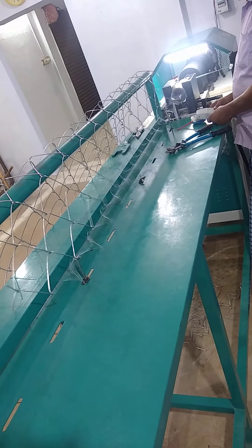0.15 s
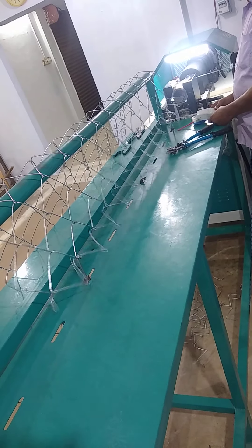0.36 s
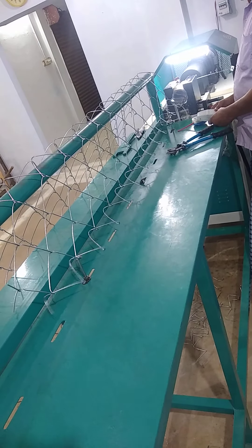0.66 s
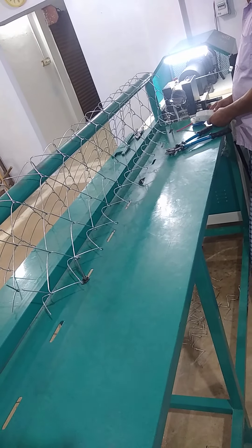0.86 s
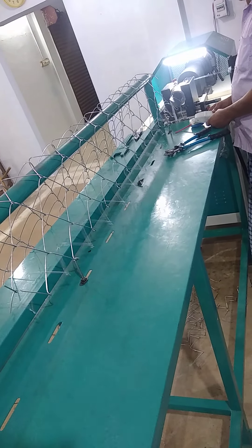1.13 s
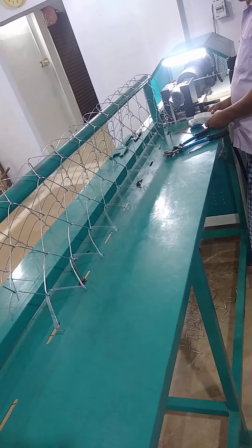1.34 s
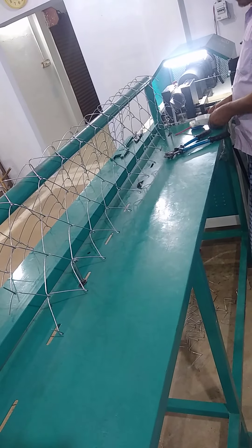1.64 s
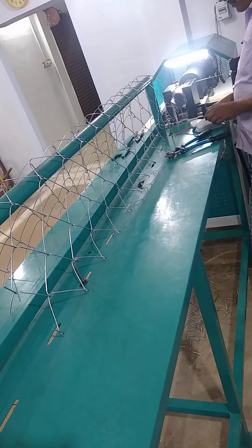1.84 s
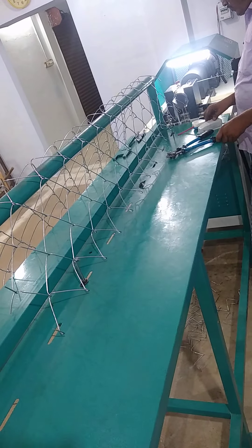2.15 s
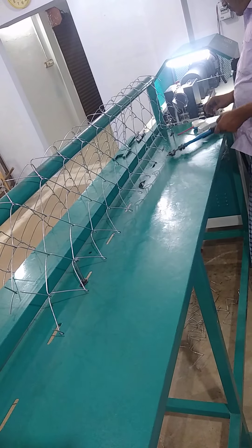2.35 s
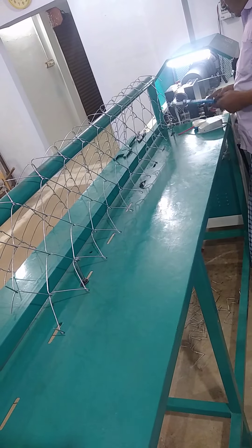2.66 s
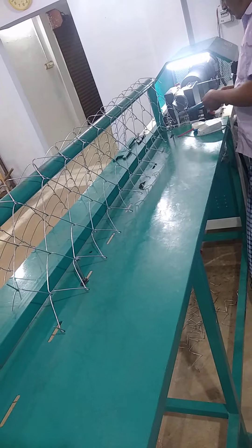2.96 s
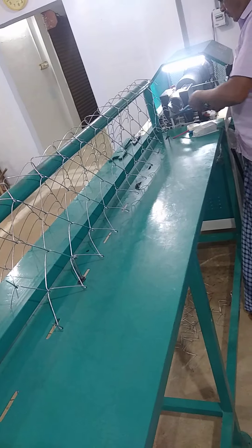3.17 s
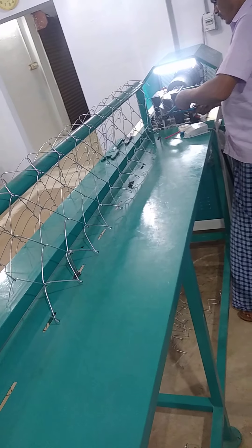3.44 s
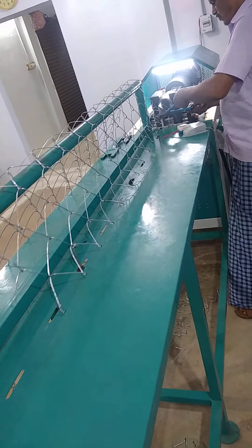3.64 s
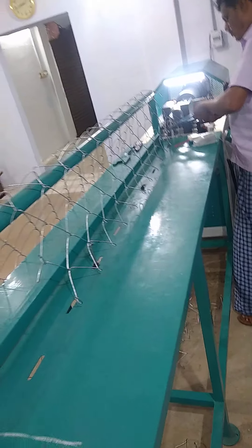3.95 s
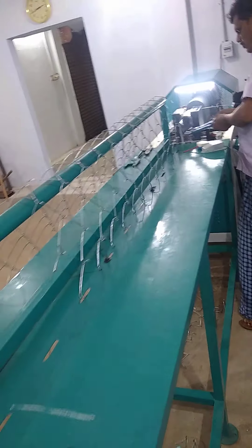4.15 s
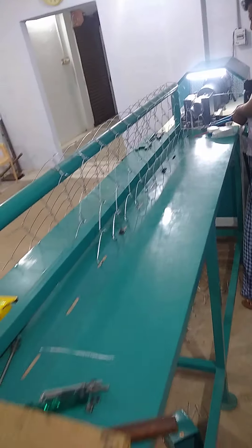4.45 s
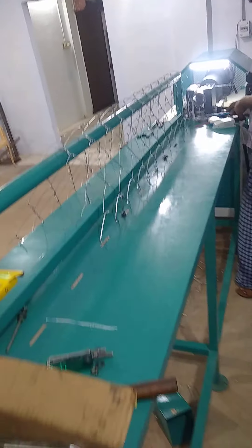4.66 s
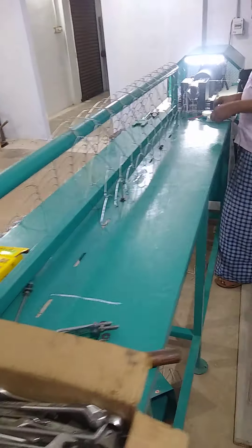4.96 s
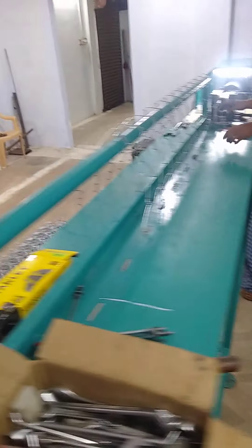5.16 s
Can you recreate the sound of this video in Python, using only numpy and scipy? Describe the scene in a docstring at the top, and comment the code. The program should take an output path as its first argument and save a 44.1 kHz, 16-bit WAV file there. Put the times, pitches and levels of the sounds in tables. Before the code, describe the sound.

A phone at the end of a long steel bench picks up a wire-mesh machine: rough grinding and clattering at once, a run-down, a second very short burst, another coast. Steel knocks ring with diffuse room echoes. Between them the motor idles with airy hum and a steady piercing buzz near four kilohertz. Late on, loose links jangle and parts thump on the bench.

```python
"""Chain-link fence machine in an echoing workshop

The drive feeds a wire spiral in two short runs of grinding and chatter, coasting down after each.
Fan air, a steady hum, a high buzz and a whine sound throughout; the wire squeals near the start.
Struck steel knocks and clanks and loose mesh jangles: bursts of shaped noise that die away, with frame modes.
Noise tails add echoes; a phone with two ports and a stereo widener listens from the far end of the bench.
"""
import sys
import numpy as np
from scipy import signal
from scipy.fft import rfft, irfft, next_fast_len
from scipy.io import wavfile

SR = 44100
rng = np.random.default_rng(int(sys.argv[2]) if len(sys.argv) > 2 else 0)


def int16_out(signal):
    """Quantize to a 16-bit WAV file."""
    q = np.round(np.clip(np.atleast_2d(signal).T, -1, 1) * 32767)
    wavfile.write(sys.argv[1], SR, q.astype(np.int16))


N = 233857
TIME = np.arange(N) / SR
ROTOR_HZ = 55.17   # turns of the idling rotor per second
WHINE_ORDER = 73   # the whine's pitch, in multiples of the rotor speed
CUTOFF_HZ = 15500   # the phone passes nothing much above this

# tone of wire struck on wire: (frequency [Hz], relative level per Hz [dB])
WIRE_COLOUR = [(60, -24), (200, 0.5), (700, 9), (2300, 8.5), (4300, 10), (5500, 7), (7800, -4.5), (9900, 3),
               (11000, 3.5), (15000, -3.5)]
# the workshop's echoes:
# (frequency [Hz], time to fall 60 dB [s], echo level against direct sound [dB], likeness at the ports [-1 to 1])
ROOM = [(103, 0.5, -0.5, 0.93), (300, 1.22, 6.5, 0.46), (683, 0.77, 3.5, 0.61), (1280, 0.71, 1, 0),
        (4300, 0.52, -0.5, 0), (8420, 0.45, -3, 0), (15000, 0.22, -6.5, 0.016)]


def from_db(db):
    """Turn decibels into a gain."""
    return 10 ** (np.asarray(db) / 20)


def rms_one(x):
    """Scale to an rms (average strength) of one."""
    return x / np.sqrt(np.mean(x ** 2) + 1e-20)


def per_bin(points, size):
    """Read a (Hz, value) table at every frequency of a transform, on a logarithmic pitch scale."""
    hz, value = np.transpose(points)
    bin_hz = np.fft.rfftfreq(size, 1 / SR)
    return np.interp(np.log(bin_hz + 1), np.log(hz), value)


def colour(x, spectrum, extra_db=0):
    """Shape white noise to a spectrum of unit power, then add an emphasis."""
    size = x.shape[-1]
    gain = rms_one(from_db(per_bin(spectrum, size)))
    return irfft(rfft(x) * gain * from_db(extra_db), size)


def drift(rate):
    """Wander at random around zero, joining `rate` chance values per second by straight lines."""
    knots = rng.standard_normal(int(N / SR * rate) + 2)
    return np.interp(TIME * rate, np.arange(len(knots)), knots)


def diffuse(size):
    """Make white noise arriving from all sides, as alike at the two ports as ROOM says."""
    alike = np.clip(per_bin([(row[0], row[3]) for row in ROOM], size), -1, 1)
    mid, side = rfft(rng.standard_normal((2, size)))
    shared = np.sqrt((1 + alike) / 2) * mid
    opposed = np.sqrt((1 - alike) / 2) * side * [[1], [-1]]
    return irfft(shared + opposed, size)


def add(track, s, sound):
    """Mix a sound into a track at time s, dropping what runs past the end."""
    start = round(s * SR)
    part = sound[..., :N - start]
    track[..., start:start + part.shape[-1]] += part


def hump(hz, width):
    """Give the spectrum of one crowded group of modes; `width` [Hz] is taken 6 dB below the peak."""
    ratio = np.geomspace(1 / 12, 12, 181)
    detune = (ratio - 1 / ratio) * hz / width
    return np.column_stack([hz * ratio, -20 * np.log10(1 + detune ** 2)])


def dense_ring(spectrum, extra_db, t60, rise_s, rattle_db):
    """Ring countless close modes of struck steel as fading noise; tiny rebounds make the decay uneven."""
    t = TIME[:SR // 2]
    rebounds = rms_one(from_db(rattle_db * drift(371)[:len(t)]))
    envelope = from_db(-60 * t / t60) * (1 - np.exp(-t / rise_s))
    return colour(diffuse(len(t)), spectrum, extra_db) * rebounds * envelope


def frame(clicks, spread_db=2):
    """Ring the steel frame: every contact excites each mode with a strength and sign of its own."""
    # (frequency [Hz], relative level [dB], time to fall 60 dB [s])
    modes = [(119.8, -9.5, 0.43), (239.5, -14.5, 0.25), (319.4, -9, 0.23), (541, 0.5, 0.084),
             (614, -4, 0.14), (674, -0.5, 0.088), (703, -4, 0.099), (831, -5, 0.13), (955, -6, 0.17),
             (1175, -17, 0.076), (1451, 1, 0.061), (1542, -2, 0.057), (3090, -5, 0.03), (3560, -5, 0.028),
             (5975, -0.5, 0.04)]
    out = np.zeros(N)
    at = np.flatnonzero(clicks)
    for hz, db, t60 in modes:
        sign, strength = rng.standard_normal((2, len(at)))
        push = np.full(N, 1e-18)   # a trace of input keeps the filter out of slow, tiny numbers
        push[at] += clicks[at] * np.sign(sign) * from_db(spread_db * strength)
        # a two-pole filter rings as a decaying cosine
        r = from_db(-60 / (t60 * SR))
        w = 2 * np.pi * hz / SR
        out += from_db(db) * signal.lfilter([1, -r * np.cos(w)], [1, -2 * r * np.cos(w), r * r], push)
    return out


def workshop(x, lead=0, first_echo_s=0.0011):
    """Add a diffuse tail off plaster walls, shorter in the treble; every call draws new echoes."""
    t = TIME[:SR]
    x = np.atleast_2d(x)
    noise = rfft(diffuse(SR))
    tail = 0
    for k, (hz, t60, db, alike) in enumerate(ROOM):
        band = per_bin([(row[0], j == k) for j, row in enumerate(ROOM)], SR)
        decay = from_db(-60 * t / t60) * (1 - np.exp(-t / first_echo_s))
        tail = tail + from_db(db) * irfft(noise * band, SR) * decay / np.linalg.norm(decay)
    # the last channel feeds the echoes; a mirrored lead-in of `lead` samples has the room already ringing
    running = np.pad(x[-1:], ((0, 0), (lead, 0)), "reflect")
    out = signal.fftconvolve(running, tail, axes=1)[:, lead:]
    out[:, :x.shape[1]] += x
    return out[:, :N]


def idle(fan_db=-38, hum_db=-42.5, hum_waver_db=1.1, mains_hz=50.1):
    """Sound the fan's air as shaped noise and the drive's magnetic hum at four times the mains."""
    # tone of the air: (frequency [Hz], relative level per Hz [dB])
    fan_colour = [(25, -9), (60, -14), (120, -2), (260, -0.5), (420, -3.5), (750, -4), (1400, -9),
                  (2600, -13.5), (4000, -8.5), (5500, -20), (7000, -33), (9000, -37.5), (11500, -39),
                  (15000, -45.5)]
    air = from_db(fan_db) * colour(diffuse(N), fan_colour)
    hum = np.sin(2 * np.pi * 4 * mains_hz * TIME)
    return air + hum * from_db(hum_db + hum_waver_db * drift(8.3))


def buzz_level(start_db=-40, fade_db_per_s=0.5):
    """Ease the level of the idle buzz and whine slowly down."""
    return from_db(start_db - fade_db_per_s * TIME)


def buzz(scatter_db=2, smear_turns=2.1, flutter_db=0.2, size=8192):
    """Repeat the idling rotor's rasp once a turn, which makes a comb of fine lines."""
    # strength of the lines: (frequency [Hz], relative level [dB])
    buzz_colour = [(200, -26.5), (2800, -39), (3350, -4), (3700, 9.5), (3960, 15.5), (4100, 14),
                   (4600, 2.5), (5100, 2), (6700, -24.5), (7900, -9), (9200, -66), (10800, -21),
                   (11900, -14.5), (13200, -48)]
    turn = np.arange(size) / size
    orders = np.arange(size // 2 + 1)
    hz, db = np.transpose(buzz_colour)
    line_db = np.interp(orders * ROTOR_HZ, hz, db) + scatter_db * rng.standard_normal((2, len(orders)))
    line_db[:, WHINE_ORDER] = -60   # this order sounds as the whine instead
    # echoes smear the rasp differently at each port: only the phases of this noise are used
    rasp = rfft(rng.standard_normal((2, size)) * np.exp(-turn / smear_turns))
    phases = rasp / abs(rasp)
    audible = orders * ROTOR_HZ < CUTOFF_HZ
    one_turn = irfft(phases * from_db(line_db) * audible, size)
    running = np.array([np.interp(ROTOR_HZ * TIME, turn, port, period=1) for port in one_turn])
    return buzz_level() * rms_one(running) * from_db(flutter_db * drift(12))


def whine(flutter_db=0.7, whine_db=-1.1):
    """Let one order of the rotor sing out as a sine near 4 kHz, fluttering slightly in level."""
    tone = from_db(whine_db) * np.sin(2 * np.pi * WHINE_ORDER * ROTOR_HZ * TIME)
    return tone * buzz_level() * from_db(flutter_db * drift(8.9))


def drive_level():
    """Under power the load surges evenly; once cut off, the drive coasts and its noise follows its speed."""
    # (start [s], cut-off [s], level [dB], time between surges [s])
    runs = [(0, 0.43, -25, 0.127), (1.125, 1.253, -27.5, 0.078)]
    spin_up_s, unload_s = 0.004, 0.0066   # taking up the load, and letting it go
    surge_db, last_surge_s = 4, 0.0071   # swing either way; the last peak comes this long before cut-off
    coast_db, coast_s = -32.5, 0.72   # freewheeling: level at full speed, time to standstill
    out = np.zeros(N)
    for start, stop, db, surge_s in runs:
        since_stop = np.maximum(TIME - stop, 0)
        engaged = np.clip((TIME - start) / spin_up_s, 0, 1)
        surge = np.cos(2 * np.pi * (TIME - stop + last_surge_s) / surge_s)
        load = from_db(db + surge_db * surge) * np.exp(-since_stop / unload_s)
        speed = np.maximum(1 - since_stop / coast_s, 0)
        out += engaged * np.hypot(load, from_db(coast_db) * speed)
    return out


def feed(contacts_per_s=170, rough_db=3.0, ring_db=-8):
    """Grind wire through the former (rough noise) while the spiral chatters (chance taps on the frame)."""
    # tone of the grinding: (frequency [Hz], relative level per Hz [dB])
    feed_colour = [(40, -43), (70, -28), (115, 3.5), (250, -2), (420, -7.5), (720, -2), (1400, -9.5),
                   (2300, -5.5), (4200, -9.5), (5500, -14), (7500, -28.5), (10000, -25), (14500, -26)]
    grind = colour(diffuse(N), feed_colour) * rms_one(from_db(rough_db * drift(110)))
    contacts = 1. * (rng.random(N) < contacts_per_s / SR)
    chatter = rms_one(frame(contacts))
    return drive_level() * (grind + from_db(ring_db) * chatter)


def thud(hz=387, level_db=-9.5, t60=0.025):
    """Swing the bench top once, low and solid, as it gives under a blow: a fading sine."""
    t = TIME[:SR // 2]
    return from_db(level_db - 60 * t / t60) * np.sin(2 * np.pi * hz * t)


def knocks(ring_db=-21, rattle_db=3.0):
    """Spiral, cutter and steel parts hit the bench: a crack, a dense clatter, a thud and frame modes."""
    # (time [s], level [dB], thump [dB], hardness [dB per octave of treble], time to fall 60 dB [s])
    blows = [(.003, -20.5, 0, 2, 0.13), (.062, -17.5, -6, -7, 0.17), (.134, -19, -9, -7, 0.12),
             (.192, -17, -5, 1, .11), (.312, -16.5, -6, -4.5, 0.22), (.394, -11, -18, -1, 0.14),
             (.432, -27, -4, 2.5, .08), (1.11, -18.5, -9, -3, 0.3), (1.161, -20, -8, 1, .1),
             (1.247, -19, -10, 1.1, 0.15), (1.833, -24.5, -14, -0.5, 0.095), (2.132, -9, -8, -0.5, 0.086),
             (2.143, -11, -9.5, -1.5, 0.064), (4.474, -12, 0.5, 0.55, 0.14), (4.689, -14, 2.5, 0.06, 0.19),
             (4.735, -17.5, -3.5, -0.46, 0.25), (4.899, -15, -24.5, -1.5, .1),
             (4.908, -13.5, -5.5, -1, 0.11)]
    # tone of the clatter: (frequency [Hz], relative level per Hz [dB])
    knock_colour = [(50, -45), (110, -21), (220, -12), (350, -6.5), (650, -3.5), (1000, -5.5), (1500, -5.5),
                    (2300, -8), (3400, -9), (4400, -9.5), (5500, -18), (7600, -31.5), (10000, -25),
                    (14500, -40)]
    thump_hz, treble_hz = 337, 790   # thump acts fully below the first, hardness above the second
    crack_db, crack_t60 = -15, 0.033   # the first hard touch, against the level of the blow
    crack_rise_s, clatter_rise_s = 0.00079, 0.0013
    out, clicks = np.zeros((2, N)), np.zeros(N)
    bass = per_bin([(thump_hz, 1), (treble_hz, 0)], SR // 2)
    bin_hz = np.fft.rfftfreq(SR // 2, 1 / SR)
    treble_octaves = np.log2(np.maximum(bin_hz / treble_hz, 1))
    for s, db, thump_db, hardness, t60 in blows:
        treble_db = hardness * treble_octaves
        crack = dense_ring(WIRE_COLOUR, treble_db, crack_t60, crack_rise_s, rattle_db)
        clatter_db = thump_db * bass + treble_db
        clatter = dense_ring(knock_colour, clatter_db, t60, clatter_rise_s, rattle_db)
        blow = from_db(crack_db) * crack + clatter + from_db(thump_db) * thud()
        add(out, s, from_db(db) * workshop(blow))   # each blow lands at another spot
        add(clicks, s, from_db([db]) * np.sqrt(t60 / 0.1))   # a brief touch hands the frame less energy
    add(out, 0, workshop(from_db(ring_db) * frame(clicks)))
    return out


def clanks(rise_s=0.0027, rattle_db=2):
    """Ring narrow bands of struck steel: clanks, a low thud, the body of heavy blows, a bright snip."""
    # (time [s], frequency [Hz], width [Hz], level [dB], time to fall 60 dB [s])
    bands = [(.031, 3200, 1100, -23.5, .16), (.17, 3300, 1300, -19, 0.065), (.293, 3430, 1200, -16, 0.055),
             (.399, 3070, 1200, -19.5, 0.1), (1.109, 1010, 550, -17.5, 0.27), (1.163, 174, 111, -20, 0.16),
             (1.179, 1590, 450, -13, 0.061), (1.231, 770, 520, -12.5, 0.086), (1.833, 945, 480, -20, 0.053),
             (1.835, 2600, 700, -24.5, 0.094), (3.936, 304, 180, -27, 0.059),
             (4.127, 9700, 1100, -21.5, .05), (4.474, 688, 850, -13.5, 0.06), (4.69, 480, 650, -10, 0.04),
             (4.909, 3420, 990, -14, 0.073)]
    out = np.zeros((2, N))
    for s, hz, width, db, t60 in bands:
        clank = dense_ring(hump(hz, width), 0, t60, rise_s, rattle_db)
        add(out, s, from_db(db) * workshop(clank))
    return out


def jangles(rise_s=0.00067, rattle_db=0.5):
    """Slap loose links against each other, ringing as bright, fading noise."""
    # (time [s], level [dB], body: emphasis of the lower tones [dB], time to fall 60 dB [s])
    slaps = [(0.082, -26, -2, 0.25), (0.149, -24, -8, 0.13), (.215, -18.5, -2, 0.27), (.436, -26, -5, .1),
             (0.467, -17, -3, 0.15), (.624, -30, 0.5, 0.38), (.708, -26.5, 0.5, 0.21),
             (1.002, -27.5, 3.5, 0.019), (1.3, -31, 5, 0.39), (1.36, -26.5, 0.5, 0.17),
             (1.484, -32, 2, 0.23), (2.315, -47.5, 16, .3), (2.899, -47.5, 11.5, 0.2),
             (3.927, -39, 2.5, 0.21), (4.104, -28, 0, 0.35), (4.128, -19, 0.5, 0.23),
             (4.162, -32, 11, 0.16), (4.198, -28.5, 8.5, 0.4)]
    out = np.zeros((2, N))
    for s, db, body_db, t60 in slaps:
        emphasis = per_bin([(4500, body_db), (8000, 0)], SR // 2)   # full below 4.5 kHz, none above 8 kHz
        add(out, s, from_db(db) * dense_ring(WIRE_COLOUR, emphasis, t60, rise_s, rattle_db))
    return out


def squeals(waver=0.013):
    """Let the wire stick and slip for a moment: a sine on one wavering pitch that swells and fades."""
    # (time of the peak [s], length [s], frequency [Hz], level [dB])
    moments = [(0.14, 0.051, 1440, -24.5), (0.177, 0.0099, 5280, -22), (0.452, 0.026, 8080, -36),
               (0.458, 0.11, 4400, -25.5)]
    out = np.zeros(N)
    for s, length, hz, db in moments:
        phase = 2 * np.pi * np.cumsum(hz * (1 + waver * drift(300))) / SR
        swell = np.exp(-(2 * (TIME - s) / length) ** 2)
        out += from_db(db) * swell * np.sin(phase)
    return out


def tick(rise_s=0.0011, rattle_db=0.5):
    """Tap once, small and without an echo: a short burst of one group of modes."""
    start_s, level_db, t60 = 1.005, -19.5, 0.025
    spectrum = hump(943, 410)   # centre and width [Hz]
    out = np.zeros((2, N))
    add(out, start_s, from_db(level_db) * dense_ring(spectrum, 0, t60, rise_s, rattle_db))
    return out


def scene():
    """Mix the machine and the handling with echoes; the idling sounds and the tick stay dry."""
    idling = idle() + buzz() + whine()
    machine = workshop(feed() + squeals(), lead=SR // 8)
    handling = knocks() + clanks() + workshop(jangles()) + tick()
    return idling + machine + handling


def record(dry, low_cut_hz=70):
    """Shade the phone's left port; its widener feeds each port, late and inverted, to the other side."""
    # tone of the left port: (frequency [Hz], level [dB])
    left_port = [(100, -0.5), (1000, -2), (3000, -3.5), (5500, -2), (7300, -5.5), (10000, -1.5), (15000, 1)]
    # strength of the inverted feed to the other side: (frequency [Hz], level [dB])
    cross_feed = [(250, -10.5), (900, -3.5), (2100, 2.5), (4400, -3), (6700, -9.5), (8800, 4.5),
                  (11000, -9), (15000, -8)]
    cross_lag_s = .000453
    size = next_fast_len(N + SR // 4)
    hz = np.fft.rfftfreq(size, 1 / SR)
    low_cut = signal.butter(2, low_cut_hz, "high", fs=SR, output="sos")
    ports = rfft(signal.sosfilt(low_cut, dry), size)
    ports[0] *= from_db(per_bin(left_port, size))
    cross = from_db(per_bin(cross_feed, size))
    late = np.exp(-2j * np.pi * hz * cross_lag_s)
    wide = (ports - cross * late * ports[::-1]) / np.sqrt(1 + cross ** 2)
    low_pass = 1 / np.sqrt(1 + (hz / CUTOFF_HZ) ** 480)   # a very steep edge
    return from_db(3.0) * irfft(wide * low_pass, size)[:, :N]


dry = scene()
out = record(dry)
int16_out(out)
```